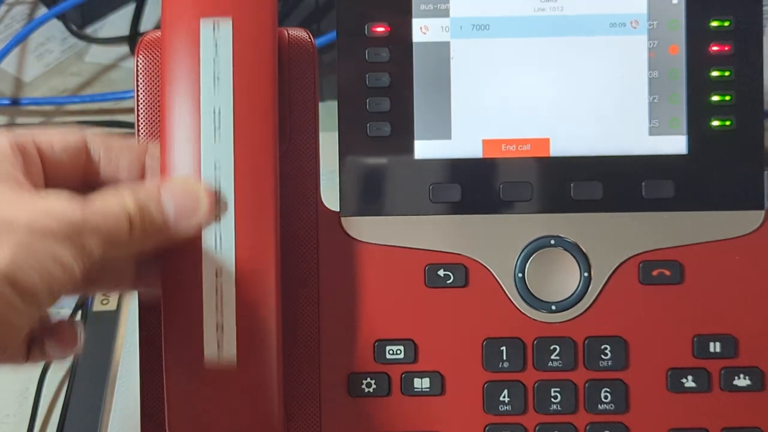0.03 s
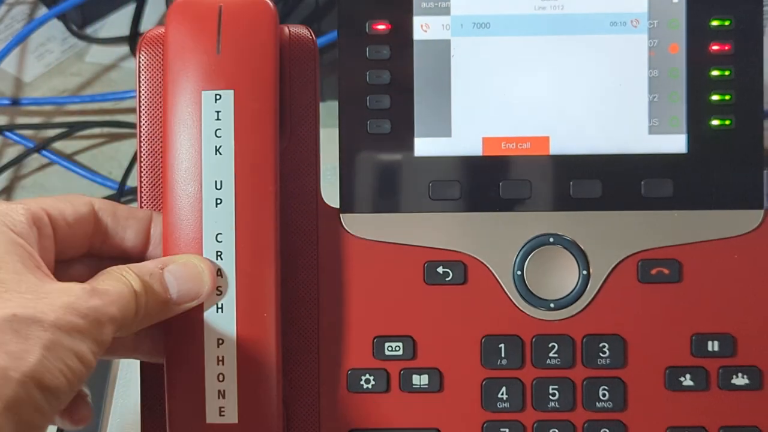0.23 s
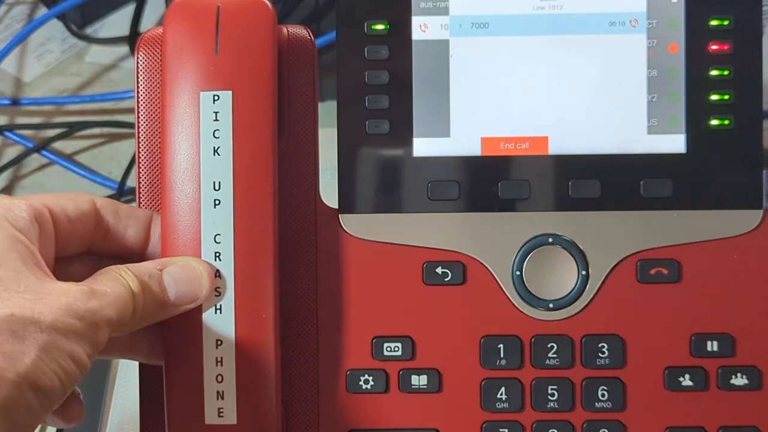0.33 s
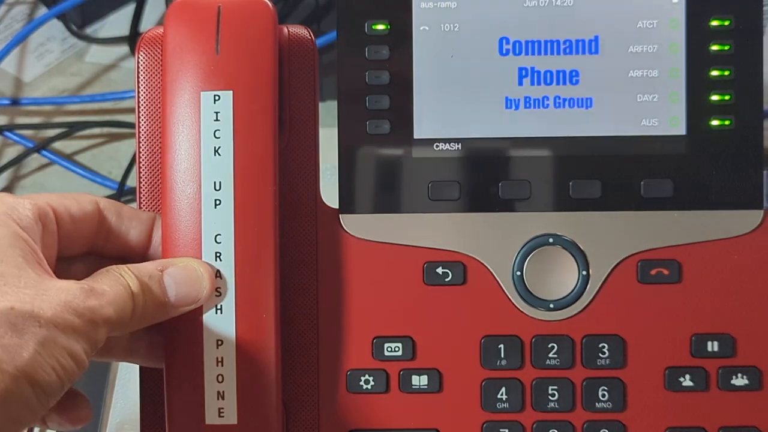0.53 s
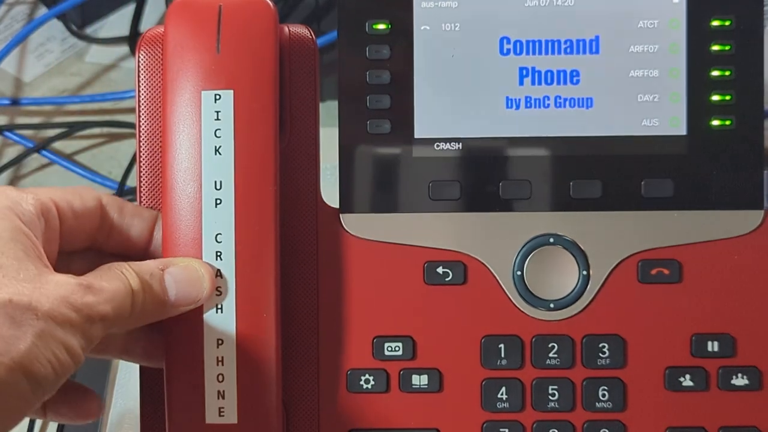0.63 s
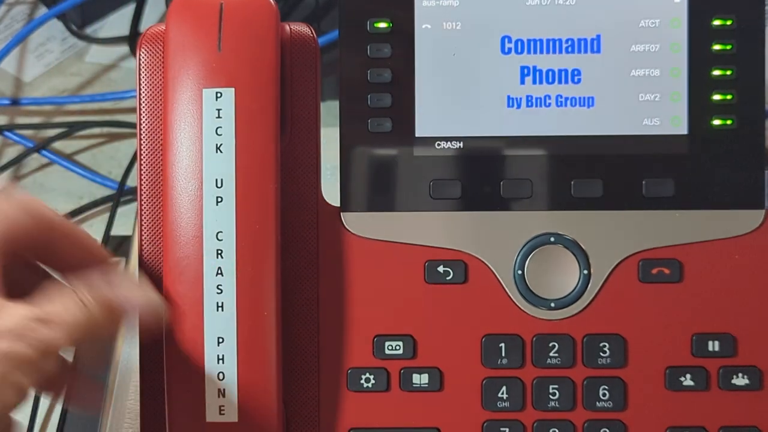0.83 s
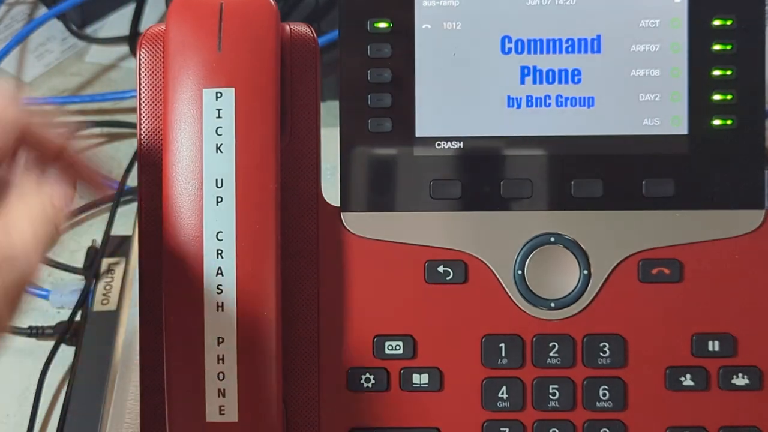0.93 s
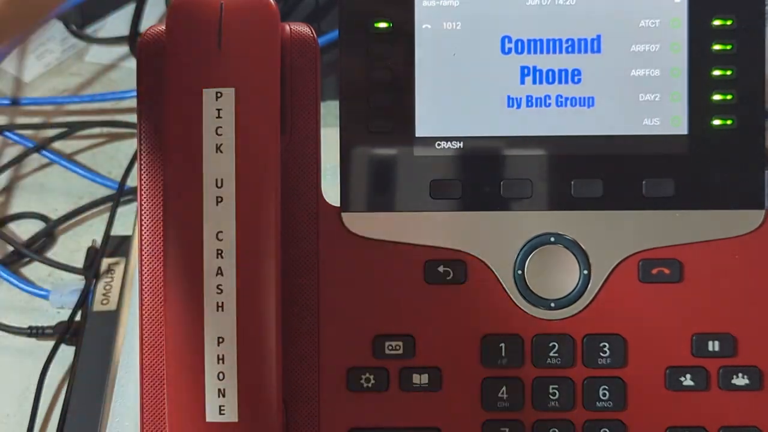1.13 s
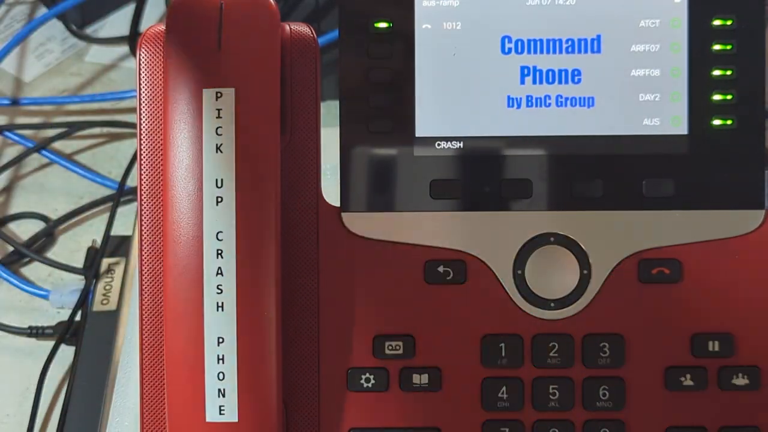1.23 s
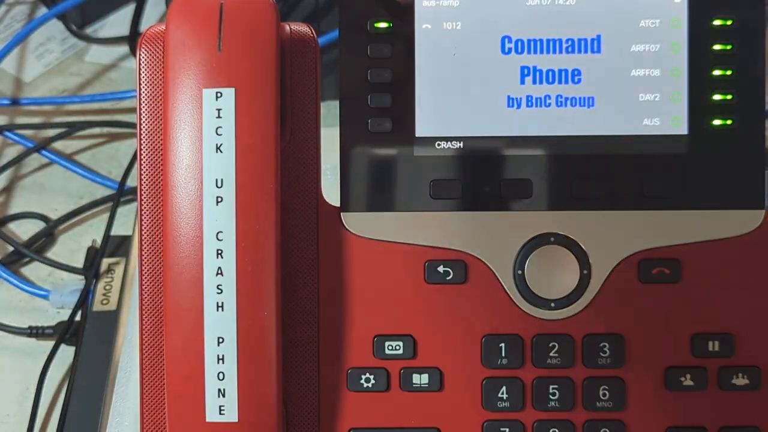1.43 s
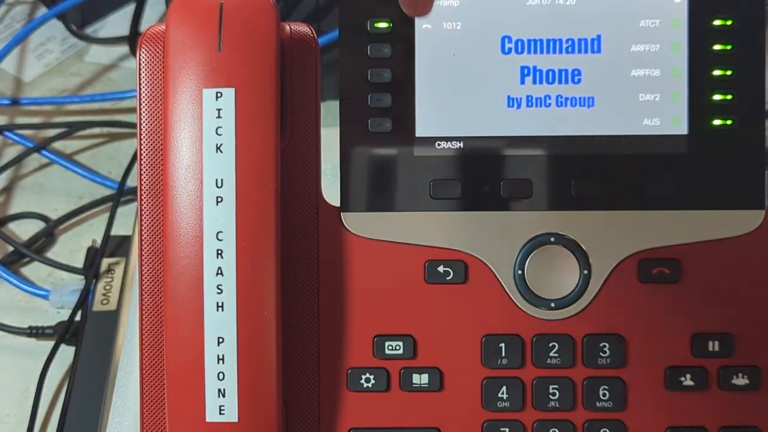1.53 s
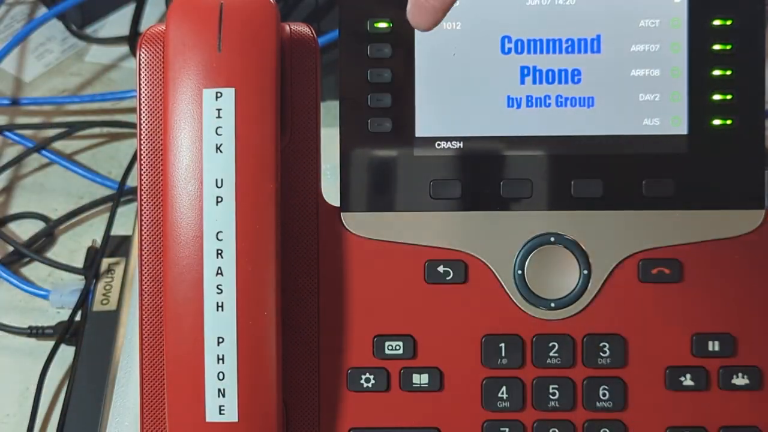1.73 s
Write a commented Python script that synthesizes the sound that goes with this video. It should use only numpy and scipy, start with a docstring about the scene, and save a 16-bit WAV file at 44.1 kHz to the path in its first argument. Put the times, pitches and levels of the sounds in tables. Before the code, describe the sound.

A plastic telephone handset drops into its cradle at about 0.2 seconds, making one sharp, hollow clack with a low knock that dies quickly, close to the microphone. Three soft low bumps follow between 0.5 and 0.9 seconds as the hand lets go. Faint equipment hum and fan noise run throughout in the small room, with a thin hiss rising slightly around 1.6 seconds.

```python
"""A plastic telephone handset drops into its cradle, close to a stereo pair in a small quiet room.
Equipment hums and fans hiss from the start. A faint rush of noise swells into the clack: the handset grazes
the rim at 0.21 s and seats in a quick cluster of contacts that ring the hollow shells, knock the base
and thump the desk. Three soft low bumps follow as the hand lets go; near the end a thin hiss lifts."""
import sys
import numpy as np
from scipy import signal
from scipy.fft import rfft, irfft
from scipy.io import wavfile
from scipy.ndimage import uniform_filter1d, minimum_filter1d

SR = 44100
rng = np.random.default_rng(int(sys.argv[2]) if len(sys.argv) > 2 else 0)


def digitize_waveform(pressure):
    """Quantize a signal to 16-bit integers and store it at the path in sys.argv[1].

    Rows of a 2-D input are taken as channels; values are limited to [-1, 1].
    """
    field = np.atleast_2d(pressure).T
    bounded = np.clip(field, -1, 1)
    quanta = np.round(bounded * 32767).astype(np.int16)
    wavfile.write(sys.argv[1], SR, quanta)


N = 79380

# air noise of the fans: (frequency [Hz], relative level [dB])
FAN_COLOUR = [(20, -34), (36, -3.5), (52, 2.5), (85, -6), (150, -5), (250, -8), (330, -2.5), (400, -7.5),
              (580, -2), (760, -14), (1150, -11.5), (1550, -18.5), (2150, -20.5), (2700, -19.5),
              (4000, -32.5), (5900, -33), (6500, -27.5), (7200, -39.5), (7600, -32.5), (7850, -25),
              (8250, -27.5), (8800, -43.5), (10000, -50.5), (16000, -59)]
# how alike the fans arrive at the two microphones: (frequency [Hz], correlation [-1 to 1])
FAN_CORRELATION = [(50, 0.79), (130, 0.98), (290, 0.86), (640, 0.46), (1400, -0.5), (3100, 0.22),
                   (7000, -0.065)]
# hum of the equipment: (frequency [Hz], level [dB])
HUM_TONES = [(59.2, -57.5), (119.7, -52.5), (175, -63), (216, -62.5), (320, -59.5), (479, -63.5),
             (597.5, -61)]
# thin hiss over the fans: (frequency [Hz], relative level [dB])
HISS_COLOUR = [(1500, -25), (2300, -3), (2700, 0), (3200, -6), (4200, -30), (8000, -60)]
# its late lift: (time [s], level [dB])
HISS_LEVEL = [(0, -76), (1.25, -76), (1.65, -68), (1.8, -69)]
# decay of the room: (frequency [Hz], t60 [s])
ROOM_T60 = [(150, 0.23), (700, 0.2343), (2000, 0.27), (6000, 0.2653), (15000, 0.22)]
# tone of its reflections: (frequency [Hz], gain [dB])
ROOM_COLOUR = [(150, 4), (450, 1.5), (600, 2.5), (800, -1.5), (1200, 3), (3000, -3), (6000, 3.5),
               (15000, 4.5)]
# the hand letting go: (time [s], length [s], level [dB], mid pitch [Hz], pitch fall [octaves/s])
HAND_BUMPS = [(0.48, .12, -37.5, 56.4, 2), (0.653, .03, -35.5, 90.5, 23), (.832, .045, -35.5, 88, 28)]
# faint rush of noise around the clack: (frequency [Hz], relative level [dB])
RUSH_COLOUR = [(300, -19), (700, -3), (1100, 0), (2700, -12.5), (4000, -16), (8000, -21), (15000, -42)]
# modes of the desk: (frequency [Hz], level [dB], t60 [s])
DESK_MODES = [(62, -33.5, .21), (119.6, -33, 0.12)]
# modes of the telephone's base: (frequency [Hz], level [dB], t60 [s])
BASE_MODES = [(170, -37, .1), (250, -45, 0.12), (294, -23.5, 0.1), (400, -22, 0.033), (454.6, -11.5, 0.037)]
# handset meeting cradle: (time [s], shell gain [dB], crack level [dB], tick level [dB], tick top [Hz])
CONTACTS = [(.2084, -38.5, -27, -18.5, 9000), (.2120, -36, -33, -24.5, 9500), (.2152, -17, -17, -21, 9000),
            (.2171, -16, -21, -15.5, 17000), (.21955, -13, -17.5, -21.5, 12000),
            (.2220, -5.5, -15.5, -15.5, 11000), (.2265, -20.5, -19.5, -29, 9000)]
# tick of the hard edges: (frequency [Hz], relative level [dB])
TICK_COLOUR = [(1000, 3), (3500, -6), (5500, -2), (8200, 1.5), (9500, -3.5), (12000, 2.5), (13500, -2),
               (16000, -2.5)]
# crack of the plastic: (frequency [Hz], relative level [dB])
CRACK_COLOUR = [(500, -25), (800, -14), (1150, 1.5), (1500, -4), (1950, 0), (2800, -4.5), (3700, -10.5),
                (4200, -18.5), (9000, -33)]
# modes of the hollow plastic shells: (frequency [Hz], relative level [dB], t60 [s])
SHELL_MODES = [(604.5, -11.5, 0.1), (635, -5.5, 0.1), (819.5, 0, 0.033), (940, -1.5, 0.046),
               (1090, -12, 0.036), (1236, -9.5, 0.039), (1341, -16, 0.049), (1653, -11, 0.032),
               (1814, -7, 0.036), (2020, -15, 0.02), (2446, -13, 0.033), (2760, -13.5, 0.055),
               (3123, -18.5, 0.047), (3230, -34, 0.041)]
# response of the left microphone: (frequency [Hz], gain [dB])
LEFT_MIC = [(100, 0), (800, 0), (2000, 2.5), (8500, 0), (10500, -1.5), (12500, -9), (15000, -22)]

TIME, FREQS = np.arange(N) / SR, np.fft.rfftfreq(N, 1 / SR)


def amp(db):
    """Decibels to gain."""
    return 10 ** (np.asarray(db) / 20)


def unit(x):
    """Scales to rms 1."""
    return x / np.sqrt(np.mean(x ** 2) + 1e-20)


def read(points, hz):
    """Reads a table on a log-frequency axis."""
    table_hz, value = np.transpose(points)
    return np.interp(np.log(hz + 1), np.log(table_hz), value)


def colour(x, points):
    """Filters by a table of (frequency [Hz], gain [dB])."""
    size = x.shape[-1]
    gain = amp(read(points, np.fft.rfftfreq(2 * size, 1 / SR)))
    return irfft(rfft(x, 2 * size) * gain)[..., :size]


def since(start):
    """Seconds since start, zero before it."""
    return np.maximum(TIME - start, 0)


def decay(t, t60):
    """Falls 60 dB in t60 seconds."""
    return np.exp(-np.log(1000) * t / t60)


def ring(modes, t, rise_s):
    """Decaying modes after one blow."""
    tones = sum(amp(db) * decay(t, t60) * np.cos(2 * np.pi * hz * t) for hz, db, t60 in modes)
    return (1 - np.exp(-t / rise_s)) * tones


def drift(rate_hz):
    """A slow random wander, complex, of rms 1."""
    white = rng.standard_normal(N) + 1j * rng.standard_normal(N)
    lowpass = np.exp(-.5 * (np.fft.fftfreq(N, 1 / SR) / rate_hz) ** 2)
    slow = np.fft.ifft(np.fft.fft(white) * lowpass)
    return slow / np.sqrt(np.mean(abs(slow) ** 2))


def stereo_noise(spectrum):
    """Coloured noise of rms 1, different at each microphone."""
    return unit(colour(rng.standard_normal((2, N)), spectrum))


def burst(spectrum, t, t60, top_hz=SR, rise_s=.0004):
    """Noise standing for dense, quickly dying high modes."""
    noise = irfft(rfft(stereo_noise(spectrum)) / np.sqrt(1 + (FREQS / top_hz) ** 10), N)
    return noise * (1 - np.exp(-t / rise_s)) * decay(t, t60)


def fans(level_db=-48.5):
    """Steady air noise, alike at both microphones in the bass and diffuse above."""
    left, independent = rfft(rng.standard_normal((2, N)))
    correlation = read(FAN_CORRELATION, FREQS)
    right = correlation * left + np.sqrt(1 - correlation ** 2) * independent
    air = colour(irfft(np.array([left, right]), N), FAN_COLOUR)
    return amp(level_db) * unit(air)


def hum(waver_depth=.25):
    """Mains and fan tones in the centre of the image, each wavering a little."""
    out = np.zeros(N)
    for hz, db in HUM_TONES:
        waver = 1 + waver_depth * drift(rate_hz=4)
        tone = np.exp(2j * np.pi * (hz * TIME + rng.random()))
        out += amp(db) * (waver * tone).real
    return np.sqrt(2) * out


def hiss():
    """A faint band of hiss near 2.7 kHz that lifts towards the end."""
    level_db = np.interp(TIME, *np.transpose(HISS_LEVEL))
    return amp(level_db) * stereo_noise(HISS_COLOUR)


def room(direct, gain_db=-9.5, delay_s=.0034, build_s=.0018):
    """Dense reflections of the small room build up quickly and die band by band."""
    hz, t, bands = signal.stft(rng.standard_normal((2, SR // 2)), SR, nperseg=256)
    _, tail = signal.istft(bands * decay(t, read(ROOM_T60, hz)[:, None]), SR)
    tail *= 1 - np.exp(-since(delay_s)[:tail.shape[1]] / build_s)
    tail = colour(tail / np.linalg.norm(tail, axis=1, keepdims=True), ROOM_COLOUR)
    return amp(gain_db) * signal.fftconvolve(direct, tail, axes=1)[:, :N]


def hand_bumps(right_db=-25):
    """Soft low swells as the hand lets go, each sinking in pitch, mostly on the left."""
    out = np.zeros(N)
    for at, length, db, hz, fall in HAND_BUMPS:
        pitch = hz * 2 ** (-fall * np.clip(TIME - at, -length, length))
        phase = 2 * np.pi * np.cumsum(pitch) / SR + np.angle(drift(rate_hz=.15 * hz))
        swell = np.exp(-(2 * (TIME - at) / length) ** 2)
        out += amp(db) * swell * np.cos(phase)
    return np.array([out, amp(right_db) * out])


def rush(end_s=.28, end_db=-35.5, growth_db_per_s=133):
    """A faint rush of noise swells into the clack and stops just after it."""
    level_db = end_db - growth_db_per_s * abs(end_s - TIME)
    return stereo_noise(RUSH_COLOUR) * amp(level_db) * (TIME < end_s)


def base_and_desk():
    """The base takes the weight with a low knock; the desk swings a little later."""
    knock = ring(BASE_MODES, since(.22), rise_s=.00083)
    thump = ring(DESK_MODES, since(.222), rise_s=.012)
    return knock + thump


def edge_ticks():
    """Hard edges tick; the sharper the contact, the higher the tick reaches."""
    return sum(amp(db) * burst(TICK_COLOUR, since(start), t60=.016, top_hz=top_hz)
               for start, _, _, db, top_hz in CONTACTS)


def plastic_cracks():
    """Each contact gives a short, dry crack of plastic."""
    return sum(amp(db) * burst(CRACK_COLOUR, since(start), t60=.03) for start, _, db, _, _ in CONTACTS)


def shell_ring(rise_s=.000099, right_lag_s=.0001, right_lift_db=1, lowest_hz=115):
    """Each contact rings the hollow shells, close to the microphones; they radiate no deep bass."""
    out = np.zeros((2, N))
    for start, db, *_ in CONTACTS:
        out[0] += amp(db - right_lift_db / 2) * ring(SHELL_MODES, since(start), rise_s)
        out[1] += amp(db + right_lift_db / 2) * ring(SHELL_MODES, since(start + right_lag_s), rise_s)
    return signal.sosfilt(signal.butter(2, lowest_hz, "highpass", fs=SR, output="sos"), out)


def scene():
    """The close clack and its reflections, with the room tone behind."""
    shells, cracks, ticks = shell_ring(), plastic_cracks(), edge_ticks()
    reflections = room(amp(-1) * shells + amp(1.5) * cracks + ticks)
    close = shells + cracks + ticks + base_and_desk() + rush() + hand_bumps()
    room_tone = hum() + fans() + hiss()
    return close + reflections + room_tone


def record(dry, low_cut_hz=34.5, ceiling=.95, top_hz=15800):
    """The pair, its left microphone duller on top, feeds a low cut, a fast limiter and a high cut."""
    pair = np.array([colour(dry[0], LEFT_MIC), dry[1]])
    pair = signal.sosfilt(signal.butter(4, low_cut_hz, "highpass", fs=SR, output="sos"), pair)
    gain = ceiling / np.maximum(abs(pair).max(0), ceiling)
    gain = uniform_filter1d(minimum_filter1d(gain, size=45), size=45)  # held and smoothed over 1 ms
    high_cut = signal.firwin(255, top_hz, window=("kaiser", 9), fs=SR)
    return signal.oaconvolve(pair * gain, high_cut[None], "same")


dry = scene()
out = record(dry)
digitize_waveform(out)
```